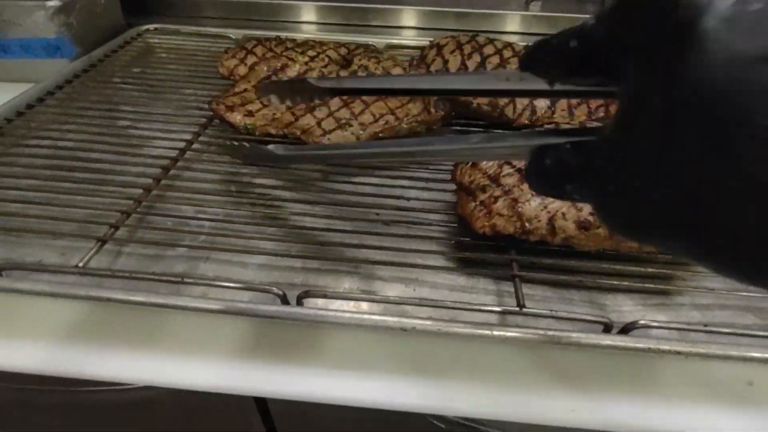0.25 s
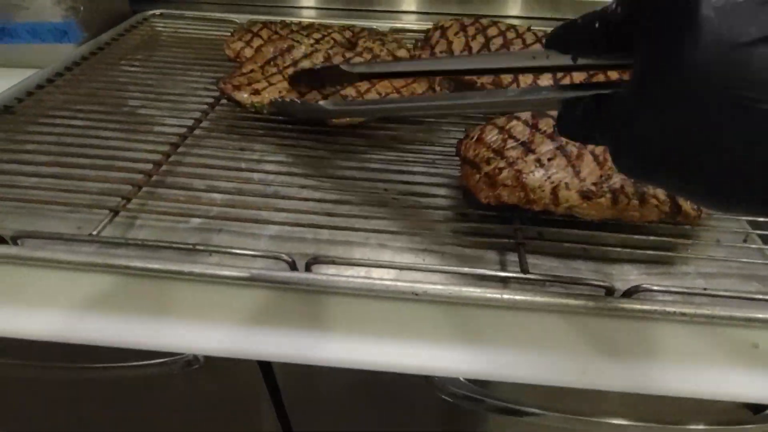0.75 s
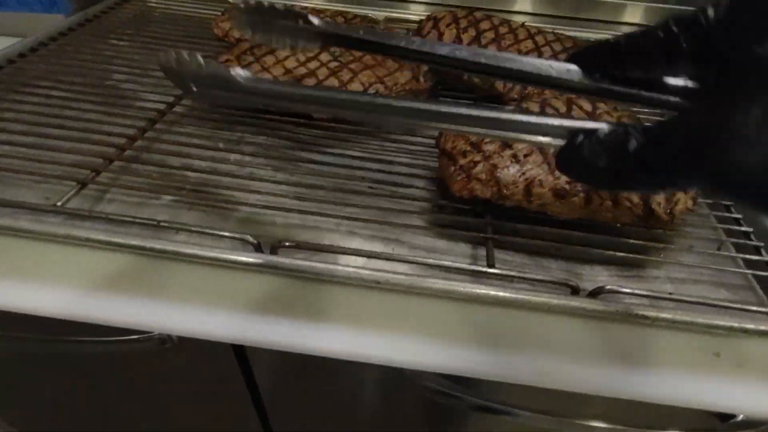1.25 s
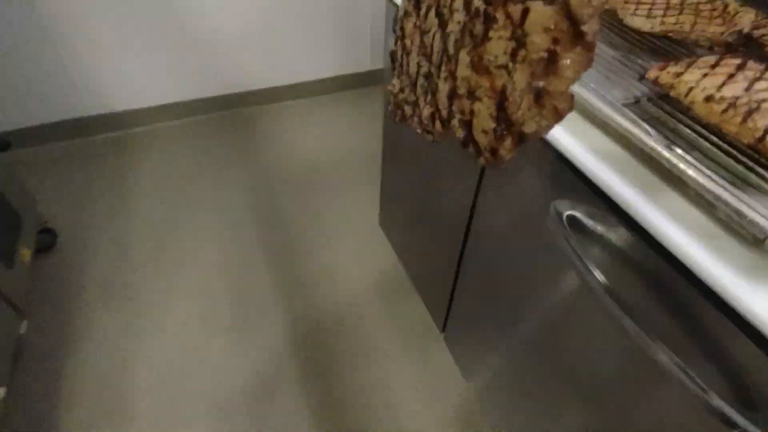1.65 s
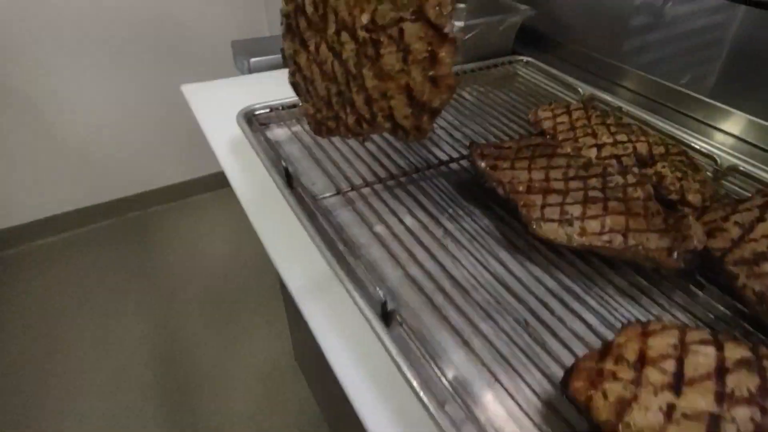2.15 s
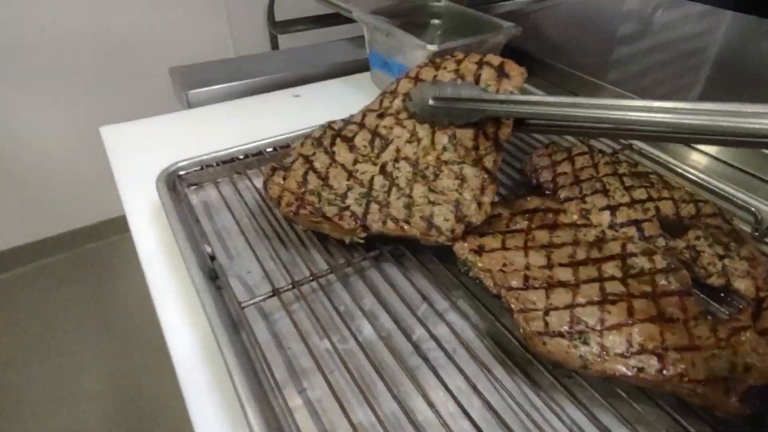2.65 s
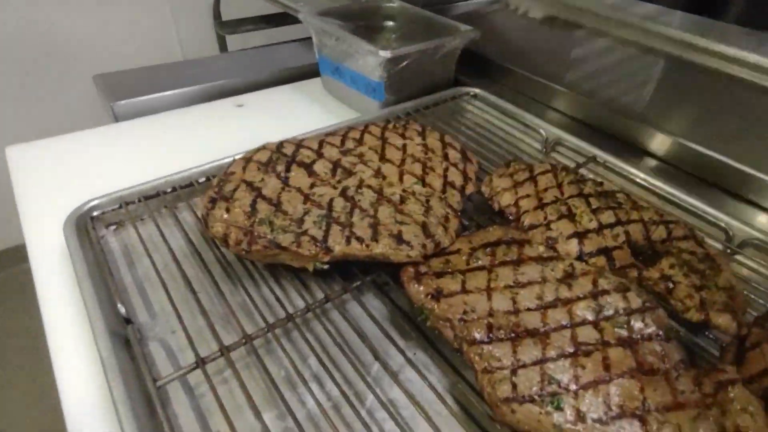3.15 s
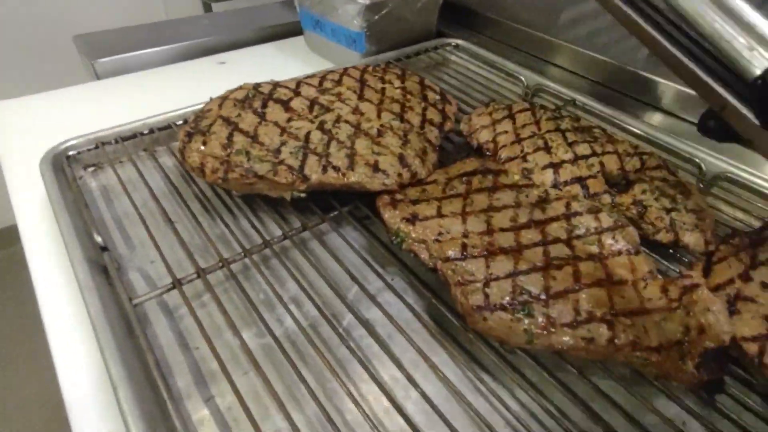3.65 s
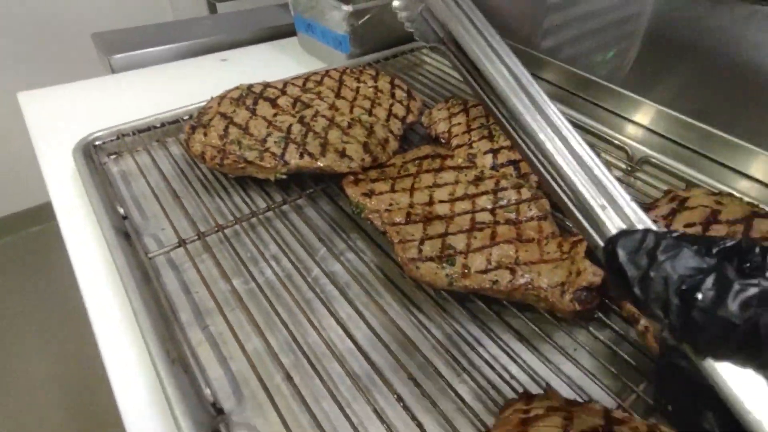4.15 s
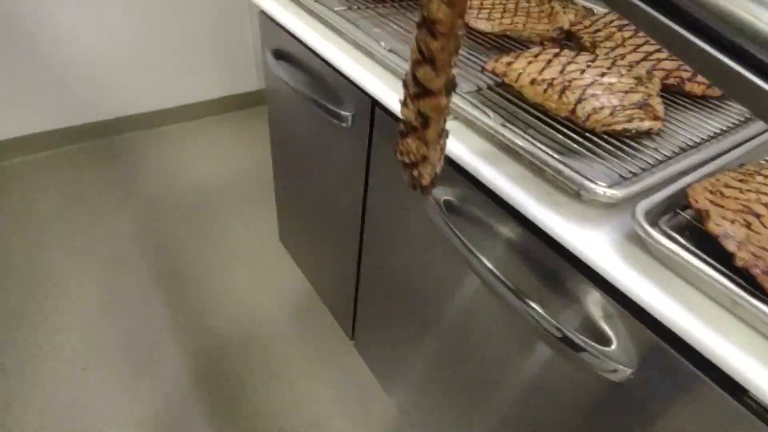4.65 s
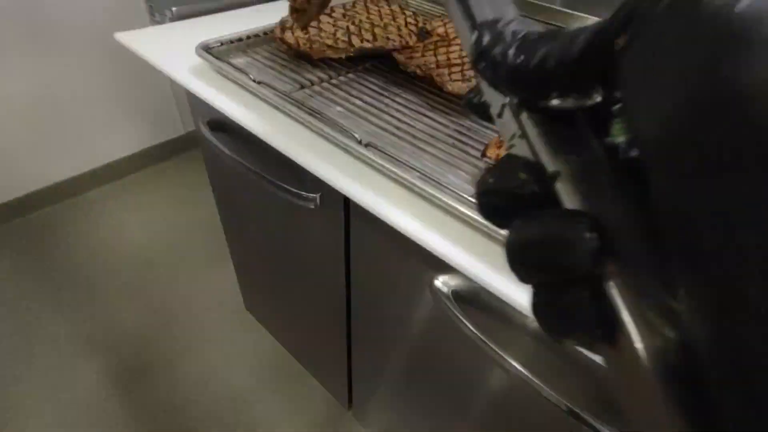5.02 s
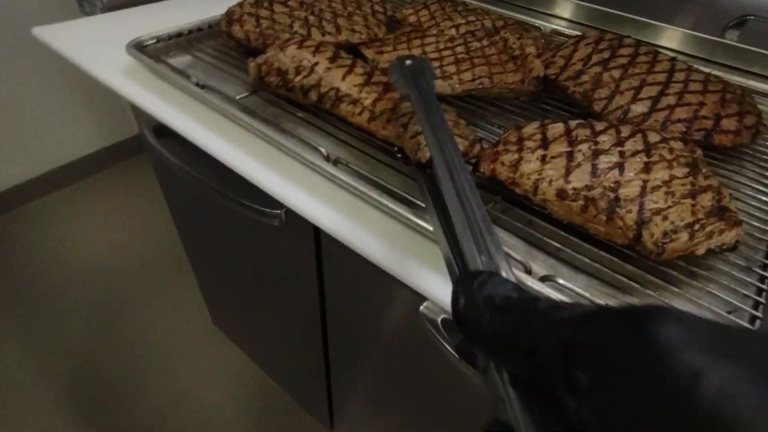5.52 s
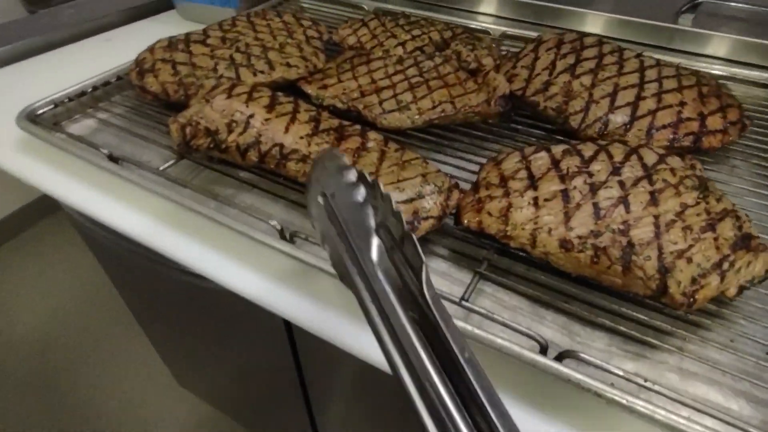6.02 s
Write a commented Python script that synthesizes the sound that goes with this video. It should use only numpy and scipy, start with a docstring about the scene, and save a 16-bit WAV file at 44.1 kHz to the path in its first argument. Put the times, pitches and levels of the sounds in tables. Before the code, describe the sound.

Close by, metal tongs clack on a wire rack in a sheet pan, ringing briefly and echoing off hard walls. Low fan rumble, rushing air and wavering machine tones run underneath. Two abrupt dropouts of a third of a second split the sound into three parts: a few sharp clinks, a dense rattle with soft meat landings, then quieter taps and light scraping.

```python
"""In a hard-walled kitchen, steel tongs move grilled meat between wire racks set in sheet pans.
The tongs clink, scrape and once squeak on the wires: short ticks and noise set the wire pitches ringing.
The pans knock dully and soft landings shake the counter; noise that dies away gives the echo of the walls.
Fans and a compressor hum, made of noise bands and wavering tones, over a faint microphone hiss.
Twice the sound is muted for a third of a second."""
import sys
import numpy as np
from scipy import signal
from scipy.io import wavfile

SR = 44100
rng = np.random.default_rng(int(sys.argv[2]) if len(sys.argv) > 2 else 0)


def master(y):
    """Save y as 16-bit WAV."""
    cut = np.clip(np.atleast_2d(y).T, -1, 1)
    pcm = np.round(cut * 32767)  # scale
    wavfile.write(sys.argv[1], SR, pcm.astype(np.int16))


N = 276859

# All levels within a table are relative to each other unless marked otherwise.
# Tongs hitting wire: [t/s, level/dB, brightness/dB per octave, favoured f/Hz,
# chatter t60/s (held to 0.002-0.3), left minus right/dB]; t60 is the time to fade by 60 dB
CLINKS = [(0.3293, -22, -0.5, 5940, 0.084, -1), (0.3409, -19, -2.3, 1970, 0.52, 2),
          (0.4719, -15.5, 2.5, 6950, 0.01, -1), (0.4829, -11, 0.1, 2030, 0.046, -0.5),
          (0.5014, -40, 6, 7180, .026, 6.5), (0.5945, -28.5, -5, 3520, 0.3, 13),
          (0.783, -25.5, 2.5, 7350, 0.097, 0.5), (0.791, -32, -7.5, 6400, .04, -6),
          (0.8044, -23.5, -6, 6800, 0.11, 0), (2.7736, -44.5, -13, 1970, 0.17, 0),
          (3.1135, -35.5, -4, 5970, .029, -3), (3.1491, -11, -3, 1990, 0.051, -0.5),
          (3.1575, -13, 0.5, 6170, 0.014, 8), (3.1669, -25, -1, 6030, 0.03, 2),
          (3.2464, -32.5, -10.5, 1910, 0.077, 1), (3.4709, -13, -2.5, 2460, 0.011, -1),
          (3.517, -15.5, -8, 2140, 0.051, -1.5), (3.5262, -18.5, -4.5, 2900, 0.016, 4),
          (3.6194, -40, -9, 1950, 0.046, 10), (3.6495, -32.5, -8.5, 1870, .05, 7.5),
          (3.7432, -42, -14, 2300, 0.026, 10.5), (4.1322, -40.5, -0.7, 6300, 0.051, 8.5),
          (5.3901, -21, -1, 2650, 0.033, 0.5), (5.4165, -28.5, -9.5, 2650, 0.012, 2.5),
          (5.8857, -32, -10.5, 2510, 0.025, -3), (5.916, -38.5, -11, 2400, 0.36, 5)]
# Tongs and rack wires, damped by the glove and the meat: [f/Hz, level/dB, t60/s]
WIRES = [(1954, -4, 0.012), (2103, 4.5, 0.016), (2080, -9, 0.02), (2350, -4.5, 0.023), (2570, 1.5, 0.11),
         (2793, -0.5, 0.086), (2890, 0, 0.053), (3520, -8, 0.027), (4335, -6.5, 0.035), (5100, -5, 0.025),
         (5340, -5, 0.024), (5590, -7, 0.018), (6000, 4, 0.055), (5940, -9, 0.05), (6030, -5.5, 0.04),
         (5870, -2.5, .03), (6240, -3.5, 0.027), (6340, 0, 0.035), (7300, -1, 0.032), (7100, -14, .04)]
# The rack's countless close pitches, heard as a wash: [centre f/Hz, level/dB, t60/s]
RACK_WASH = [(1590, -2.5, 0.049), (2244, 6, 0.12), (3100, -6, 0.064), (4180, 1, 0.12), (6460, 3.5, 0.24),
             (7200, 0, 0.043), (10600, -4.5, 0.05), (13000, -2, 0.025), (15500, -2, 0.033)]
# How unevenly the two sides hear the near steel: [f/Hz, left minus right/dB]
STEEL_TILT = [(1500, 4), (3000, -0.5), (6000, 5), (9000, -6.5), (13000, -5)]
# Tongs and meat dragged over wires: [loudest t/s, swell/s, fade/s, level/dB, brightness/dB per octave]
SCRAPES = [(1.91, 0.18, 0.14, -39.5, -3), (2.36, .06, 0.19, -48.5, 6), (2.5, 0.25, 0.21, -39.5, -2.5),
           (4.214, 0.16, .16, -31.5, 4), (5.225, .19, 0.12, -55, 3), (5.9, 0.15, 0.23, -43.5, 0)]
# Tone colour of the scrapes: [f/Hz, level/dB per Hz]
SCRAPE_COLOUR = [(900, -9.5), (1300, 1.5), (2000, -5.5), (2900, 5), (4000, 1), (5200, 7), (6200, -10),
                 (7500, -13.5), (9500, -44.5), (12500, -35), (14500, -14.5), (16000, -24)]
# A tong tip squeaking along a wire: [t/s, half length/s, f/Hz, rms level at its loudest/dB]
SQUEAK = (5.846, .011, 5400, -44)
# Pan knocked through the rack: [t/s, level/dB, favoured f/Hz, left minus right/dB]
KNOCKS = [(0.341, -26.5, 1420, -10), (0.461, -14, 680, -5), (0.595, -27.5, 750, -6), (0.948, -21, 583, 3),
          (2.773, -22, 655, -4), (3.246, -16, 597, -2.5), (3.502, -27.5, 622, 12), (3.515, -20, 665, -6),
          (3.553, -11, 825, 2), (3.573, -17.5, 882, -9), (3.652, -14.5, 613, -2), (3.751, -26, 694, -1),
          (3.865, -23, 640, 1), (3.959, -27, 656, -1), (5.366, -21.5, 572, 14), (5.388, -22.5, 1210, -8.5),
          (5.583, -18.5, 600, 1.5), (5.648, -28, 584, 0.5)]
# Ringing pitches of the sheet pan: [f/Hz, level/dB, t60/s]
PAN = [(447, -10.5, 0.038), (595, -5, 0.032), (633, -4, 0.07), (708.6, 0.5, 0.05), (800, -10, 0.07),
       (858, -5.5, 0.016), (937, 0.5, .04), (1105, -2.5, 0.046), (1240, -2.5, 0.053), (1250, -14.5, 0.035),
       (1433, -5.5, 0.11), (1570, -7.5, 0.019)]
# Meat landing and the counter shaking: [t/s, level/dB]
THUMPS = [(0.589, -30.5), (3.249, -25.5), (3.515, -24), (3.66, -24.5), (3.869, -30), (4.129, -34.5),
          (5.589, -40.5)]
# Low rumble of the fans: [f/Hz, level/dB per Hz]
RUMBLE = [(15, -69), (25, -40), (113, -6.5), (141, -7.5), (183, -6), (239, -9.5), (271, -9), (420, -14.5),
          (500, -12.5), (650, -42), (1100, -120)]
# Rush of air from the fans: [f/Hz, level/dB per Hz]
RUSH = [(180, -39.5), (300, 0.5), (418, -20), (477, -8.5), (697, -1), (836, -8), (1180, -7.5), (1290, -6),
        (2180, -10), (2620, -13), (3890, -29.5), (6830, -26), (7920, -32.5), (9340, -45.5), (15600, -37.5)]
# Machine tones, each [f/Hz, width of one resonance/Hz, level/dB]
COMPRESSOR_DRONE = [(120.2, 17, -9), (144.64, 14, -0.5), (200, 35, -13.5)]
MOTOR = [(242.1, 3, 4.5), (491.5, 3.4, -5)]
WHINE = [(8000, 22, -2)]
SINGING_TONES = [(641, 23, 0), (1222, 44, 0), (2665, 36, 0)]  # low, middle and high
# Machine sounds that swell and sink most, as rms levels:
# [t/s, compressor drone level/dB, whine level/dB, high singing tone level/dB]
SWELLS = [(0.0, -31, -50.5, -68), (0.75, -35, -47, -50), (1.1, -41, -46.5, -52), (1.35, -27.5, -55, -65),
          (1.53, -28, -56.5, -69), (1.87, -43, -76, -68.5), (2.5, -38.5, -57.5, -67),
          (3.0, -38.5, -53.5, -70), (3.5, -32, -53, -62), (4.27, -32, -49, -62), (4.61, -34, -62, -53.5),
          (5.1, -37, -60, -56), (5.5, -38, -43, -56), (5.85, -33, -56, -44), (6.28, -39.5, -57, -47.5)]
# Machine tones and microphone hiss that hold a level, then step to another while muted, as rms levels:
# [from t/s, motor level/dB, low singing tone level/dB, middle singing tone level/dB, hiss level/dB]
STEPPED_LEVELS = [(0, -39, -49.5, -56.5, -62.5), (1.7, -44, -52, -50.5, -61), (4.4, -37.5, -63, -64, -77)]
# How alike left and right are in the fan noise, machine tones and squeak: [f/Hz, likeness from -1 to 1]
LIKENESS = [(60, 0.75), (150, 0.98), (380, 0.87), (950, -0.043), (2380, -0.091), (5980, -0.13),
            (15000, -0.18)]
# Their balance between the sides: [f/Hz, left minus right/dB]
TILT = [(60, -3.5), (150, 0.0), (380, 0.5), (950, 2), (2380, 7), (5980, 10), (15000, -2)]
# Silences: [from t/s, to t/s]
MUTES = [(1.5318, 1.871), (4.2718, 4.611)]

CLINK_PIVOT_HZ = 5500  # brightness turns about this pitch
RACK_AWAY_DB = 1  # loss of the rack's wash per octave from the favoured pitch
STROKE_DB = 31.5  # how far a scrape drops over its swell time or fade time
KNOCK_CHATTER_S = 0.078  # t60 of the ticks after a knock
COUNTER_HZ, COUNTER_T60_S = 91, 0.28
KITCHEN_T60_S, TREBLE_T60_S, WALL_CUT_HZ, KITCHEN_DB = 0.73, 0.17, 11000, -7.5
RUMBLE_DB, RUSH_DB, HISS_LOW_HZ = -35.5, -35.5, 13800
MUTE_EDGE_S, TOP, CUTOFF_HZ = .002, 1.05, 16200  # fade at a mute; level where peaks round; treble limit


def clinks():
    """Each blow rings the wire pitches near its favoured one, cracks, and shivers through the rack."""
    events = np.array(CLINKS)
    favoured_hz = events[:, 3]
    ticks = contacts(events[:, 5], events[:, 4], spread_db=3.5, apart=1.2, strike=0.31, rise_s=0.00078)
    luck = rng.standard_normal((len(events), len(WIRES)))

    def colour(hz):
        return events[:, 1] + events[:, 2] * np.log2(hz / CLINK_PIVOT_HZ)

    out = np.zeros((2, N))
    for k, (hz, level_db, t60) in enumerate(WIRES):
        away_db = 71.0 * np.abs(np.log2(hz / favoured_hz))
        blow_db = colour(hz) + level_db - 2.0 - away_db + 2 * luck[:, k]
        out += ring(force(events, ticks, blow_db), hz, t60)
    for hz, level_db, t60 in RACK_WASH:
        away_db = RACK_AWAY_DB * np.abs(np.log2(hz / favoured_hz))
        blows = force(events, ticks, colour(hz) + level_db + 21 - away_db)
        crack = band(blows, hz * .83, min(hz * 1.164, 19000))
        out += sides(at_hz(STEEL_TILT, hz)) * (crack + from_db(3) * wash(crack, t60))
    return out


def scrapes():
    """Dragging is a run of uneven tiny slips, heard as hiss and through the ringing wires."""
    stroke, bright = strokes()
    grit = rng.standard_normal((2, N)) * from_db(2.1 * rng.standard_normal(N))
    slips = stroke * rms_one(grit)

    def scrape_db(hz):
        return at_hz(SCRAPE_COLOUR, hz) + bright * np.log2(hz / CLINK_PIVOT_HZ)

    out = np.zeros((2, N))
    for hz, level_db, t60 in WIRES:
        out += ring(from_db(scrape_db(hz) + level_db - 37.0) * slips, hz, t60)
    edges = np.geomspace(900, 16000, num=13)
    for low, high in zip(edges, edges[1:]):
        out += from_db(11 + scrape_db(np.sqrt(low * high))) * band(slips, low, high)
    return out


def strokes():
    """Each stroke swells, then fades, unevenly; the loudest one of the moment sets the brightness."""
    t = np.arange(N) / SR
    levels = []
    for s, swell, fade, level_db, _ in SCRAPES:
        distance = np.where(t < s, (s - t) / swell, (t - s) / fade)
        levels.append(from_db(level_db - STROKE_DB * distance))
    levels = np.array(levels)
    bright = np.array(SCRAPES)[levels.argmax(axis=0), 4]
    return levels.sum(axis=0) * from_db(1.8 * drift(40)), bright


def squeak():
    """A tong tip gives a short swell of one slightly rough pitch."""
    s, half, hz, level_db = SQUEAK
    swell = np.exp(-((np.arange(N) / SR - s) / half) ** 2)
    return from_db(level_db) * swell * tones([(hz, 60, 0)], steady=2.5)


def knocks():
    """A blunt blow rings the pan pitches nearest its favoured one most, over a broad thud."""
    events = np.array(KNOCKS)
    ticks = contacts(events[:, 3], KNOCK_CHATTER_S, spread_db=5.5, apart=0.93, strike=0.49, rise_s=.0015)
    luck = rng.standard_normal((len(events), len(PAN)))
    out = band(force(events, ticks, events[:, 1] + 24), 450, 2100)  # thud
    for k, (hz, level_db, t60) in enumerate(PAN):
        away_db = 13.5 * np.abs(np.log2(hz / events[:, 2]))
        blow_db = events[:, 1] + level_db + 1.0 - away_db + 0.5 * luck[:, k]
        out += ring(force(events, ticks, blow_db), hz, t60)
    return band(out, 380, 2000)


def thumps():
    """A soft heavy landing sets the counter swinging for a few cycles."""
    push = np.zeros(N)
    for s, level_db in THUMPS:
        push[round(s * SR)] = from_db(level_db)
    return band(ring(push, COUNTER_HZ, COUNTER_T60_S), 60, 200)


def kitchen(x):
    """Hard walls answer after 12 ms, a few metres of travel; the treble dies sooner."""
    late = np.pad(x, ((0, 0), (round(.012 * SR), 0)))[:, :N]
    body = wash(band(late, 200, WALL_CUT_HZ), KITCHEN_T60_S)
    treble = wash(band(late, WALL_CUT_HZ, 18000), TREBLE_T60_S)
    return body + treble


def fans_and_hiss():
    """Fans and compressor: rumble, rush of air and machine tones, plus microphone hiss."""
    drone_db, whine_db, high_tone_db = in_time(SWELLS)
    steps = np.array(STEPPED_LEVELS)
    step_now = np.searchsorted(steps[1:, 0], np.arange(N) / SR)
    motor_db, low_tone_db, middle_tone_db, hiss_db = steps[step_now, 1:].T
    white = rng.standard_normal((2, 2, N))  # neighbouring bands get unrelated noise
    out = from_db(RUMBLE_DB) * air(RUMBLE, 0.89, white)
    out += from_db(RUSH_DB) * air(RUSH, 1.0, white[:, :, ::-1])  # reversed, so unlike the rumble
    microphone_hiss = band(band(white[0], HISS_LOW_HZ, 17000), HISS_LOW_HZ, 17000)
    out += from_db(hiss_db) * rms_one(microphone_hiss)
    out += from_db(drone_db) * tones(COMPRESSOR_DRONE)
    out += from_db(motor_db) * tones(MOTOR, steady=1.3)
    for level_db, line in zip([low_tone_db, middle_tone_db, high_tone_db], SINGING_TONES):
        out += from_db(level_db) * tones([line])
    return out + from_db(whine_db) * tones(WHINE, steady=0.89)


def air(spectrum, patchy_db, white):
    """Rushing air: third-octave bands of stereo noise, each with its own level and flicker; rms 1."""
    octaves = np.log2(spectrum[-1][0] / spectrum[0][0])
    edges = spectrum[0][0] * 2 ** np.arange(0, octaves + .2, 1 / 3)
    out, together = 0, drift(1.4)
    for k, (low, high) in enumerate(zip(edges, edges[1:])):
        hz = np.sqrt(low * high)
        flicker_db = patchy_db * (0.087 * together + drift(26))
        gain = from_db(at_hz(spectrum, hz) + flicker_db)
        out = out + gain * stereo(hz, *band(white[k % 2], low, high))
    return rms_one(out)


def tones(lines, steady=0.):
    """Wavering tones: noise twice through a narrow resonance, plus a share of steady sine; rms 1."""
    out = 0
    for hz, width, level_db in lines:
        t60 = np.log(1000) / np.pi / width
        once = ring(rng.standard_normal((2, N)), hz, t60)
        rough = rms_one(ring(once, hz, t60))
        rough[0] += steady * np.sin(2 * np.pi * hz * np.arange(N) / SR)
        out = out + from_db(level_db) * stereo(hz, *rough)
    return rms_one(out)


def contacts(pan_db, t60, spread_db, apart, strike, rise_s):
    """A blow is a firm first touch, then uneven ticks that gather and die, partly unlike left and right."""
    age, count = np.arange(SR // 8) / SR, len(pan_db)
    uneven = from_db(spread_db * rng.standard_normal((count, 1, len(age))))
    ticks = rng.standard_normal((count, 3, len(age))) * uneven
    ticks = ticks[:, :1] + apart * ticks[:, 1:]  # one shared stream plus one for each side
    t60 = np.reshape(np.clip(t60, .002, .3), (-1, 1, 1))
    ticks = ticks * from_db(-60 * age / t60) * np.tanh(age / rise_s)
    ticks /= np.sqrt(np.mean(np.sum(ticks ** 2, axis=2), axis=1))[:, None, None]
    ticks[:, :, 0] = strike
    return ticks / np.hypot(1, strike) * np.array([sides(pan) for pan in pan_db])


def force(events, ticks, level_db):
    """The push of the blows laid out in time, each at its level."""
    out = np.zeros((2, N + ticks.shape[2]))
    for s, tick, gain in zip(events[:, 0], ticks, from_db(level_db)):
        start = round(s * SR)
        out[:, start:start + tick.shape[1]] += gain * tick
    return out[:, :N]


def ring(push, hz, t60):
    """A damped resonance: a unit click sets a sine of about height 1 ringing."""
    r, w = from_db(-60 / (t60 * SR)), 2 * np.pi * hz / SR
    return signal.lfilter([0, np.sin(w)], [1, -2 * r * np.cos(w), r * r], push + 1e-18)


def wash(x, t60):
    """Spreads every tick into noise that dies away, different on each side; energy 1."""
    age = np.arange(int(min(t60, 1) * SR)) / SR
    tail = rng.standard_normal((2, len(age))) * from_db(-60 * age / t60)
    tail /= np.sqrt(np.sum(tail ** 2, axis=1, keepdims=True))
    return signal.oaconvolve(x, tail, axes=1)[:, :N]


def band(x, low_hz, high_hz):
    """Keeps the pitches between two limits."""
    return signal.sosfilt(signal.butter(2, [low_hz, high_hz], "band", fs=SR, output="sos"), x)


def stereo(hz, mid, side):
    """Mixes two signals to the left-right likeness and balance set for this pitch."""
    alike = np.clip(at_hz(LIKENESS, hz), -1, 1)
    shared = np.sqrt(1 + alike) * mid
    opposed = np.sqrt(1 - alike) * side * [[1], [-1]]
    return sides(at_hz(TILT, hz)) * (shared + opposed)


def drift(rate):
    """Slow wandering: noise at every 40th sample, smoothed twice at rate (Hz); rms 1 before filling in."""
    r = np.exp(-80 * np.pi * rate / SR)
    noise = rng.standard_normal(N // 40 + 2002)
    slow = signal.lfilter([1], [1, -2 * r, r * r], noise)[2000:]  # drop the start-up
    return np.interp(np.arange(N) / 40, np.arange(len(slow)), rms_one(slow))


def sides(pan_db):
    """Left and right gains for a level difference."""
    return from_db(np.array([[.5], [-.5]]) * pan_db)


def at_hz(points, hz):
    """Reads a table at a pitch, with straight lines over log frequency."""
    table_hz, values = np.array(points).T
    return np.interp(np.log(hz), np.log(table_hz), values)


def in_time(rows):
    """The columns of a table read at every sample."""
    s, *columns = np.transpose(rows)
    return [np.interp(np.arange(N) / SR, s, c) for c in columns]


def from_db(db):
    """Decibels to a plain gain."""
    return 10 ** (np.asarray(db) / 20)


def rms_one(x):
    """Scales a signal to rms 1."""
    return x / np.sqrt(np.mean(x ** 2) + 1e-20)


def scene():
    """The steel sounds and their echo, over the thumps, the machines and the hiss."""
    steel = clinks() + scrapes() + knocks() + squeak()
    return steel + from_db(KITCHEN_DB) * kitchen(steel) + thumps() + fans_and_hiss()


def record(dry):
    """Peaks are rounded, the sound is switched off in the mutes, then the top treble is cut."""
    t, on = np.arange(N) / SR, np.ones(N)
    for start, end in MUTES:
        outside_s = np.maximum(start - t, t - end)
        on *= np.clip(outside_s / MUTE_EDGE_S + .2, 0, 1)
    rounded = TOP * np.tanh(dry / TOP)
    return signal.sosfilt(signal.cheby2(22, 80, CUTOFF_HZ, fs=SR, output="sos"), rounded * on)


dry = scene()
out = record(dry)
master(out)
```